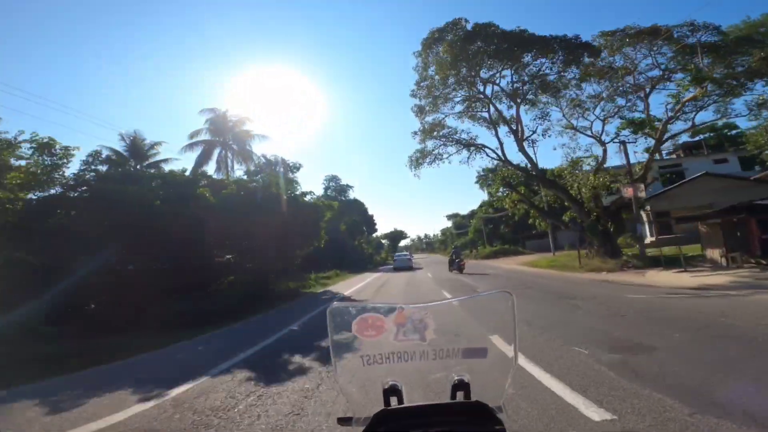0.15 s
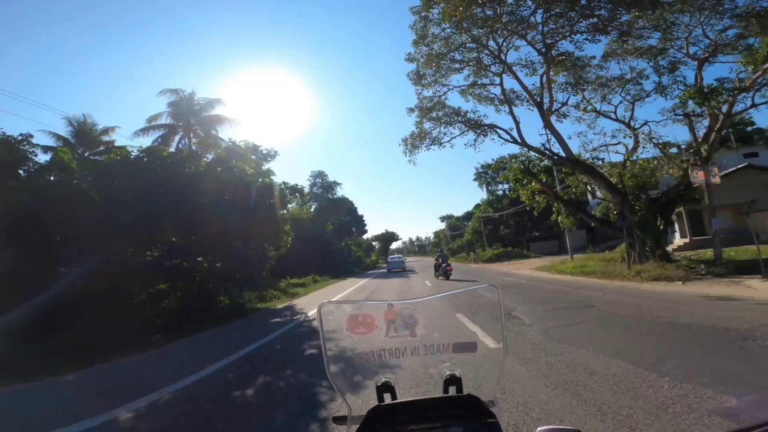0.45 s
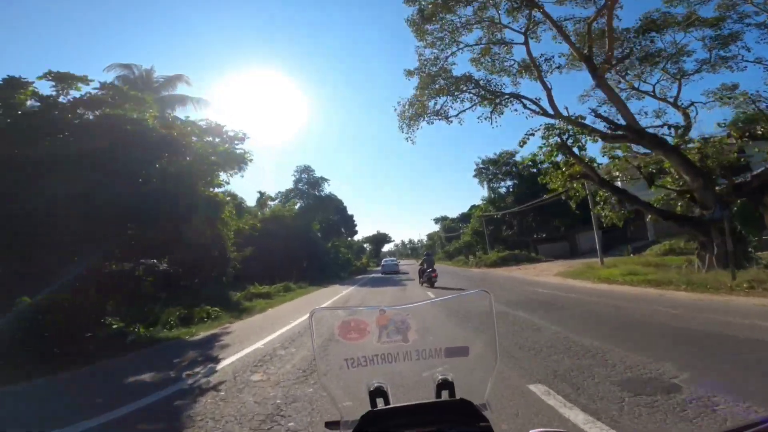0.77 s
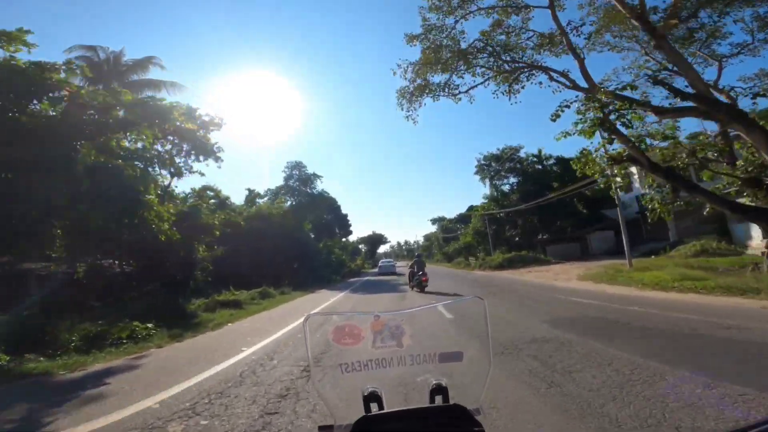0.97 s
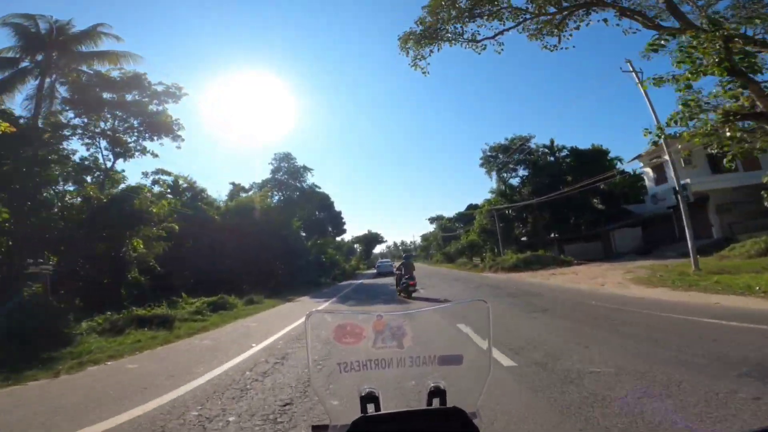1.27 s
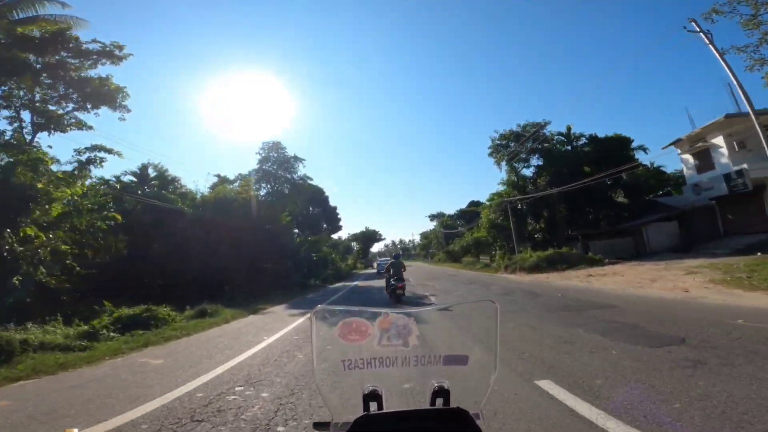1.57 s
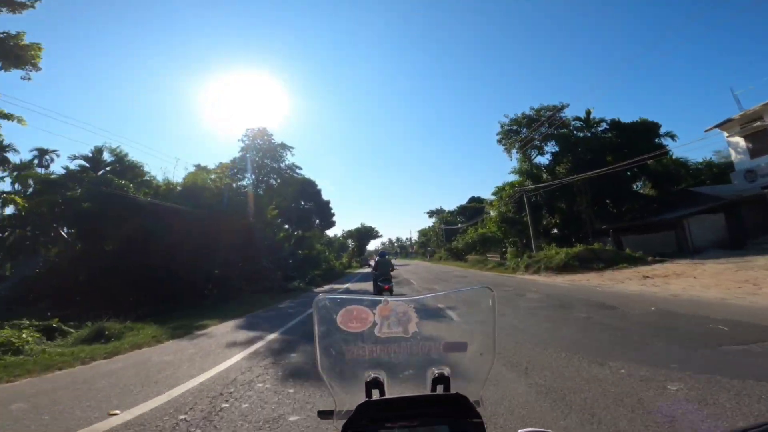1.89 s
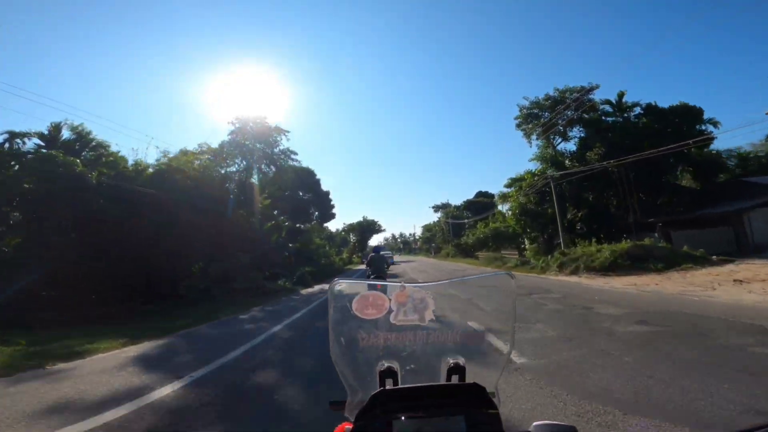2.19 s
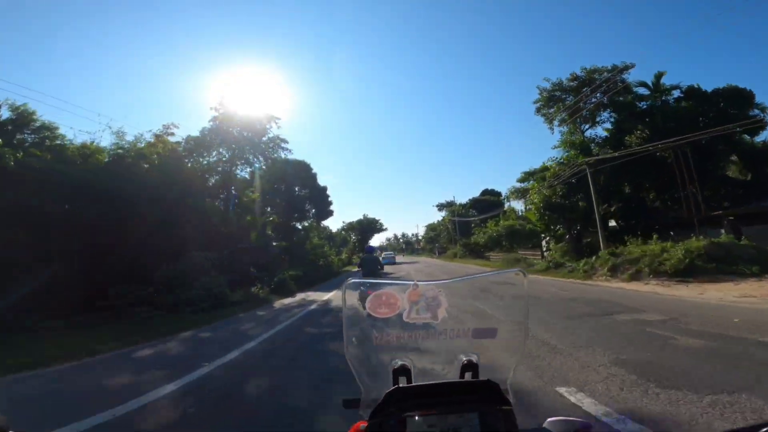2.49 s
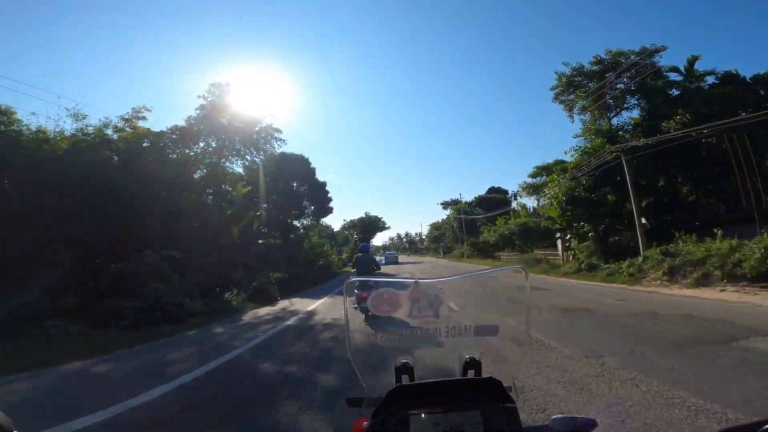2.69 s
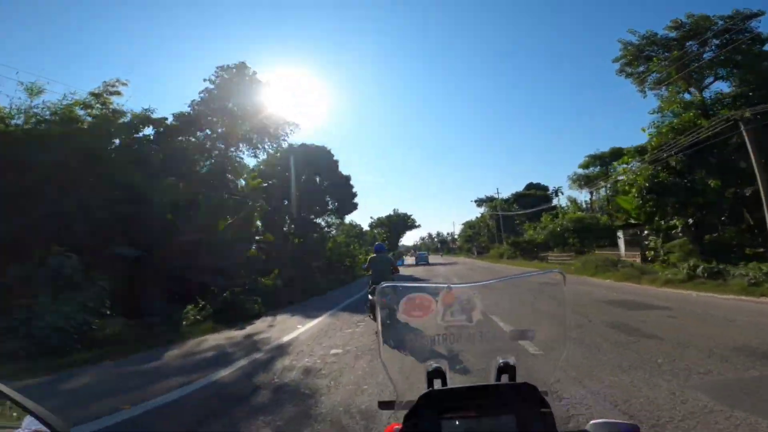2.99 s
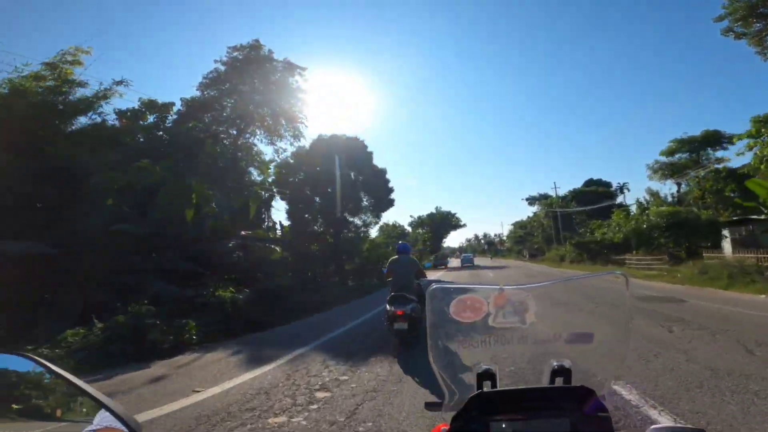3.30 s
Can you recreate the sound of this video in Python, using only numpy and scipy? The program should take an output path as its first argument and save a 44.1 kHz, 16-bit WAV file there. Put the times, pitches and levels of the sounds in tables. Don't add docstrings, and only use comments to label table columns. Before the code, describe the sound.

A motorcycle horn sounds from about 0.1 to 1.9 seconds, one steady, reedy, buzzing pitch with a bright metallic rattle. It stops abruptly, leaving a short high ring and faint roadside echo. Throughout, low lumpy wind buffets the onboard microphone over road roar and quiet engine hum. Dull bumps knock near 2.0 and 3.3 seconds; a loose metal part chinks from 2.1, more densely after 2.7.

```python
import sys
import numpy as np
from scipy import signal
from scipy.io import wavfile
from scipy.ndimage import uniform_filter1d

SR = 44100
rng = np.random.default_rng(int(sys.argv[2]) if len(sys.argv) > 2 else 0)


def master_out(mix):
    frames = np.transpose(np.atleast_2d(mix))
    ceiling = np.clip(frames, -1, 1)
    pcm = np.round(ceiling * 32767).astype(np.int16)
    wavfile.write(sys.argv[1], SR, pcm)


def level_to_linear(level):
    exponent = np.asarray(level, float) / 20
    return 10 ** exponent


N = 152145
T = np.arange(N) / SR

# frequency_hz, density_db_per_hz
BUFFET_SPECTRUM = [(24, -35), (40, 1.5), (228, -12.5), (265, -11.5), (330, -16), (430, -41), (730, -120)]
# frequency_hz, density_db_per_hz
BODY_SPECTRUM = [(53, -9), (90, -2.5), (211, -7.5), (263, -2.5), (397, -12.5), (488, -5), (591, -10),
                 (1010, -15), (2400, -34.5), (3120, -66), (5280, -120)]
# time_s, level_db
ROAR_LEVEL = [(0.0, -30), (0.02, -35), (0.1, -32.5), (0.32, -36), (1.03, -34.5), (1.93, -40), (2.98, -29),
              (3.22, -31.5), (3.45, -30)]
# frequency_hz, t60_s, level_db
LOOSE_PART_MODES = [(8600, 0.018, -7), (8770, .012, -10), (7800, 0.012, -6), (4770, .01, -7),
                    (6040, 0.0079, -7)]


def evened(x):
    return x / np.sqrt(np.mean(np.abs(x) ** 2) + 1e-20)


def curve(points, t=T):
    return np.interp(t, *np.transpose(points))


def read(points, hz):
    f, value = np.transpose(points)
    return np.interp(np.log(hz + .1), np.log(f + .1), value)


def slow(rate_hz):
    t = T[::128]
    s = sum(np.sin(2 * np.pi * (f * t + rng.random())) for f in np.linspace(.05, 1, 16) * rate_hz)
    return np.interp(T, t, evened(s))


def resonate(x, hz, width):
    turn = np.exp(2j * np.pi * hz * T)
    r = np.exp(-np.pi * width / SR)
    return 2 * (turn * signal.lfilter([(1 - r) ** 2], [1, -2 * r, r * r], x / turn)).real


def noise(shape, size, patchy_db, flicker_db):
    frames, hz = N // (size // 4) + 5, np.fft.rfftfreq(size, 1 / SR)
    a, b, patches = rng.standard_normal((frames, len(hz), 3)).T
    patches = uniform_filter1d(patches, size=8, axis=0)
    patches = evened(uniform_filter1d(patches, size=5, axis=1))
    field = read(shape, hz)[:, None] + patchy_db * patches + flicker_db * rng.standard_normal(frames)
    bins = (a + 1j * b) * level_to_linear(field)
    return evened(signal.istft(bins, nperseg=size, noverlap=size * 3 // 4)[1][:N])


def horn(engine):
    # time_s, level_db
    horn_level = [(0.1, -22), (0.352, -24), (0.486, -21.5), (0.516, -23.5), (0.61, -21.5), (1.194, -20.5),
                  (1.85, -23.5), (1.88, -20)]
    on, off = T - .0825, T - 1.893
    sag = -.6 * on / 2
    overshoot = 1.5 * np.exp(-abs(on) / .04)
    drop = -4 * np.exp(np.minimum(off / .012, .4))
    turns = np.cumsum(443.9 + sag + overshoot + drop) / SR
    release = np.exp(-np.maximum(off, 0) / .003)
    gate = np.clip(on / .004, 0, 1) * release
    swing = np.clip(on / .009 + 1, 0, 1) * release
    stack = diaphragm(engine, turns, gate, swing)
    rattle = tone_disc(turns, gate)
    rattle_db = -37 + 10 * np.exp(-abs(on) / .022)
    level = curve(horn_level)
    held = level_to_linear(-22) * evened(stack) + level_to_linear(rattle_db) * evened(rattle)
    return (off > 0) * free_ring(off) + level_to_linear(level - level.mean()) * held


def diaphragm(engine, turns, gate, swing):
    # pitch_multiple, level_db
    orders = [(1, 1), (2, -22), (3, -29), (4, -33), (5, -31), (6, -3), (7, -3), (8, -3), (9, -22),
              (10, -17), (11, -16), (12, -36), (13, -34), (14, -31), (15, -29), (16, -38), (17, -32),
              (18, -25), (19, -22), (20, -29), (21, -28), (22, -21), (23, -25), (24, -34), (25, -35),
              (26, -27), (27, -35), (28, -29), (29, -35), (30, -36)]
    # pitch_multiple, level_db
    top_orders = [(31, -34), (32, -29), (33, -34), (34, -30), (35, -36)]
    shake_rad, shake_depth = .028, .0073
    wander, wander_hz = .024, 5.17
    flutter, flutter_hz = .012, 40
    shake = np.sin(2 * np.pi * engine) + 0.26 * np.sin(4 * np.pi * engine)
    shake = (1 + 0.18 * slow(5.9)) * shake
    stumble = level_to_linear(-10 * np.exp(-((T - .094) / .0025) ** 2))
    settled = level_to_linear(7 * (np.clip((T - 1.4) / .03, 0, 1) - 0.26))
    unseated = level_to_linear(7 * np.clip((.45 - T) / .08, 0, 1))
    stack = 0
    for k, db in list(orders) + list(top_orders):
        drift = 1 + min(wander * k * k / 14, .45) * (slow(wander_hz) + 1j * slow(wander_hz))
        drift = drift + flutter * k * 1j * slow(flutter_hz)
        drift = drift / np.sqrt(np.mean(abs(drift * gate) ** 2) / np.mean(gate ** 2))
        lead = .52 * k ** 2 if k < 9 else 2 * np.pi * rng.random()
        depth = .14 if k == 7 else shake_depth * k
        nod = 1 + depth * np.cos(2 * np.pi * (engine + rng.random()))
        if k in (14, 15):
            nod = nod * settled
        if k in (15, 19):
            nod = nod * unseated
        if k > 6:
            nod = nod * stumble
        phase = k * (2 * np.pi * turns + shake_rad * shake) + lead
        stack = stack + level_to_linear(db) * (swing if k == 1 else gate) * (drift * nod * np.exp(1j * phase)).real
    return stack


def tone_disc(turns, gate):
    # frequency_hz, width_hz, level_db
    disc_modes = [(2670, 89, -6), (3106, 160, 4), (3213, 125, 2.5), (3480, 92, -18), (3704, 73, -3.5),
                  (4510, 470, -13), (4890, 280, -13.5), (6460, 1000, -23), (8110, 240, -10),
                  (8530, 170, -6.5), (9370, 1100, -15.5), (10300, 350, -13.5), (14900, 3700, -22)]
    blows = rng.standard_normal(N) * (0.32 + np.exp(-(turns % 1) / .67)) * gate
    rattle = 0
    for f, width, db in disc_modes:
        level = level_to_linear(db + slow(25.9) * 3000 / f)
        rattle = rattle + level * evened(resonate(blows, f, width)) * np.sqrt(width)
    buzz = signal.sosfilt(signal.butter(4, 9500, "high", fs=SR, output="sos"), blows)
    return evened(rattle) + level_to_linear(-12.5) * evened(buzz)


def free_ring(off):
    # frequency_hz, level_db, t60_s
    ring_modes = [(3106, -41, .45), (3192, -45, .5), (3031, -50, .6), (3250, -51, .6), (3600, -50, .45),
                  (3480, -55, .5), (3700, -53, .45), (4974, -58, .25), (4890, -59, .25), (2700, -55, .5)]
    after = np.maximum(off - .075, 0)
    ring = 0
    for f, db, t60 in ring_modes:
        level = level_to_linear(db + 3.5 * slow(45) - 60 * after / t60)
        ring = ring + level * np.sin(2 * np.pi * f * T + slow(27))
    return ring


def echo(x):
    # frequency_hz, t60_s
    decay = [(500, 1), (2700, 0.24), (3200, 0.75), (5000, 0.44), (10000, 0.56), (13000, 0.13)]
    hz, t, z = signal.stft(rng.standard_normal(SR // 2), SR, nperseg=256)
    tail = signal.istft(z * level_to_linear(-60 * t / read(decay, hz)[:, None]), SR, nperseg=256)[1]
    tail = np.r_[np.zeros(round(.012 * SR)), tail]
    smear = evened(uniform_filter1d(rng.standard_normal(N), size=round(SR / 60.5 / 2)))
    return level_to_linear(-31) * signal.fftconvolve(x * smear, tail / np.linalg.norm(tail))[:N]


def wind():
    # time_s, level_db
    gusts = [(0.0, -16.5), (0.12, -20), (0.15, -31), (0.28, -23), (0.94, -20.5), (1.04, -31), (1.14, -19.5),
             (1.3, -24), (2.12, -28), (2.15, -27), (2.93, -23.5), (2.95, -20), (3.08, -23), (3.14, -21.5),
             (3.18, -28), (3.26, -23.5), (3.34, -26), (3.45, -20)]
    # frequency_hz, density_db_per_hz
    heave_spectrum = [(1.8, -55), (3.0, -3.5), (16, 3), (25, -7.5), (45, -8.5), (58, -63), (99, -120)]
    # frequency_hz, density_db_per_hz
    hiss_spectrum = [(1060, -28), (1800, -19), (2280, -26.5), (2880, -2.5), (3670, -8.5), (4470, -7),
                     (7020, -13), (8870, -13.5), (15500, -26)]
    # frequency_hz, width_hz, level_db
    hollows = [(250.7, 16, -41.5), (450, 29, -56), (965, 330, -36), (2700, 580, -50.5), (1492, 320, -42)]
    gust, roar = curve(gusts), curve(ROAR_LEVEL)
    swell = gust - gust.mean()
    buffet = noise(BUFFET_SPECTRUM, size=1024, patchy_db=2.0, flicker_db=3.0)
    buffet = level_to_linear(gust - 0.5 + 0.25 * swell) * buffet
    heave = noise(heave_spectrum, size=8192, patchy_db=0.0, flicker_db=1.0)
    heave = level_to_linear(-13 + .19 * swell) * (heave - heave.mean())
    body = noise(BODY_SPECTRUM, size=1024, patchy_db=0.06, flicker_db=-0.7)
    body = level_to_linear(roar + 5 + .16 * swell) * body
    rise = roar - roar.max()
    hollow = 0
    for f, width, db in hollows:
        tone = evened(resonate(rng.standard_normal(N), f, width))
        hollow = hollow + level_to_linear(db + rise + 1.84 * slow(12)) * tone
    hiss = noise(hiss_spectrum, size=256, patchy_db=1.5, flicker_db=1.5)
    hiss = level_to_linear(-47.5 + .87 * rise + 0.63 * slow(20)) * hiss
    air = level_to_linear(-63) * evened(np.diff(rng.standard_normal(N + 1)))
    return buffet + heave + body + hollow + hiss + air


def slaps():
    # time_s, peak_db
    slap_times = [(.03, -14), (.3, -17), (.43, -15), (.51, -14), (.655, -10.5), (.685, -11), (.84, -10),
                  (.96, -14), (1.12, -12), (1.15, -14), (1.41, -15), (1.565, -15), (1.655, -15),
                  (1.87, -19), (2.17, -17), (2.555, -13), (2.66, -15), (2.955, -11), (2.99, -11),
                  (3.1, -14)]
    push_hz, length_s = 50, .014
    grit = .5 * noise(BUFFET_SPECTRUM, size=1024, patchy_db=2.0, flicker_db=-1.0)
    out = 0
    for (s, db), turn in zip(slap_times, rng.random(len(slap_times))):
        push = np.cos(2 * np.pi * (push_hz * (T - s) + turn))
        out = out + level_to_linear(db) * np.exp(-((T - s) / length_s) ** 2) * (push + grit)
    return level_to_linear(-2) * out


def motor(engine):
    # speed_multiple, level_db, start_s, end_s
    whine = [(5.65, -34, 0, 0.87), (4.5, -34.5, 1.1, 2.8), (8.6, -39.5, .4, 1.4), (4, -35, 0, 1.42),
             (1, -31, 0.5, 3.35), (2, -40.5, 0.5, 3.9), (4.5, -28, 2.5, 2.8), (4, -32.5, 2.5, 3.2)]
    out = 0
    for k, db, a, b in whine:
        fade = np.clip(np.minimum(T - a, b - T) / 0.11 + 0.14, 0, 1)
        tone = np.sin(2 * np.pi * k * engine + 0.92 * slow(9))
        out = out + level_to_linear(db + 1.0 + 2.5 * slow(11)) * fade * tone
    puffs = uniform_filter1d(np.exp(-(engine / 2 % 1)), size=150)
    puffs = puffs * noise(BODY_SPECTRUM, size=1024, patchy_db=.5, flicker_db=1.0)
    return out + level_to_linear(-34.5) * evened(puffs)


def chinks():
    # time_s, peak_db
    chink_times = [(2.0792, -48), (2.1162, -52), (2.168, -45), (2.1864, -48), (2.4169, -38.5),
                   (2.4318, -44), (2.5097, -49), (2.5394, -63), (2.5915, -55), (2.6708, -39), (2.7282, -45),
                   (2.8045, -37), (2.822, -41), (2.8744, -40), (2.8968, -38), (2.9194, -42), (2.9754, -44),
                   (2.9811, -42), (3.0584, -42), (3.0704, -37), (3.1018, -37), (3.1537, -41), (3.235, -37),
                   (3.2486, -48), (3.3099, -32), (3.3538, -45)]
    out, t = np.zeros(N + SR), T[:3000]
    for (s, peak_db), mix in zip(chink_times, rng.random((len(chink_times), 8))):
        burst = rng.standard_normal(3000) * np.exp(-t / .0036)
        hits = burst * (rng.random(3000) < .04) * 3 + (t == 0)
        ring = 0
        for (f, t60, db), m in zip(LOOSE_PART_MODES, mix):
            ring = ring + level_to_linear(db - 12 * m - 60 * t / t60) * np.sin(2 * np.pi * f * (1 + 0.0075 * m) * t)
        sound = signal.fftconvolve(hits, ring)[:3000]
        tick = uniform_filter1d(np.diff(burst, prepend=0), size=3)
        sound = sound / abs(sound).max() + level_to_linear(-14) * tick
        out[round(s * SR):][:3000] += level_to_linear(peak_db + 3) * sound
    return out[:N]


def bumps():
    # time_s, peak_db
    bump_times = [
        (2.036, -25),
        (3.270, -25),
    ]
    center_hz, decay_s = 570, .0053
    out, t = np.zeros(N), T[:2000]
    band = signal.butter(3, [center_hz * .5, center_hz * 2], "band", fs=SR)
    for s, peak_db in bump_times:
        knock = evened(signal.lfilter(*band, rng.standard_normal(2000)))
        envelope = np.exp(-t / decay_s) * np.minimum(t / 0.001, 1)
        out[round(s * SR):][:2000] += level_to_linear(peak_db + 3.5) * knock * envelope
    return out


def crackle():
    per_s = 120
    size = level_to_linear(4 * np.minimum(rng.exponential(1, N), 4)) * (rng.random(N) < per_s / SR)
    t, roar = T[:400], curve(ROAR_LEVEL)
    tick = sum(level_to_linear(db - 120 * t / t60) * np.sin(2 * np.pi * f * t) for f, t60, db in LOOSE_PART_MODES)
    return level_to_linear(-62 + roar - roar.max()) * signal.oaconvolve(size, tick / abs(tick).max())[:N]


def scene():
    # time_s, turns_per_s
    engine_speed = [(0, 71), (.75, 64.4), (1.75, 62), (2.3, 59.8), (3.45, 59.4)]
    engine = np.cumsum(curve(engine_speed)) / SR
    blast = horn(engine)
    mid = blast + echo(blast) + wind() + slaps() + motor(engine) + chinks() + bumps() + crackle()
    high = signal.lfilter(*signal.butter(1, 120, "high", fs=SR), mid - .95 * blast)
    high = high + 4 * signal.lfilter(*signal.butter(2, 5000, "high", fs=SR), mid)
    stray = np.clip(4 * (slow(12) - .8), 0, 1) * evened(uniform_filter1d(rng.standard_normal(N), size=300))
    side = level_to_linear(-29) * stray * high
    return np.array([mid + side, mid - side])


def roll_off(x):
    return signal.sosfilt(signal.butter(12, 15830, fs=SR, output="sos"), x)


def record(dry):
    ceiling, offset = .99, .0017
    edge = signal.firwin(1201, 15540, window=("kaiser", 8), fs=SR)
    limited = ceiling * np.tanh(dry / ceiling) + offset
    mix = signal.oaconvolve(limited, edge[None], "same")
    return roll_off(mix)


dry = scene()
out = record(dry)
master_out(out)
```